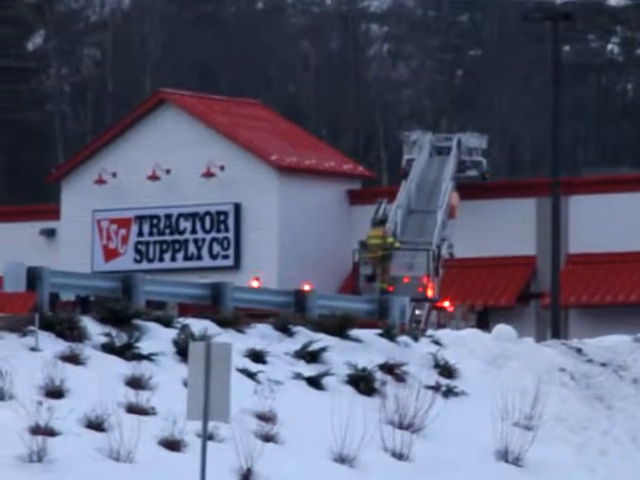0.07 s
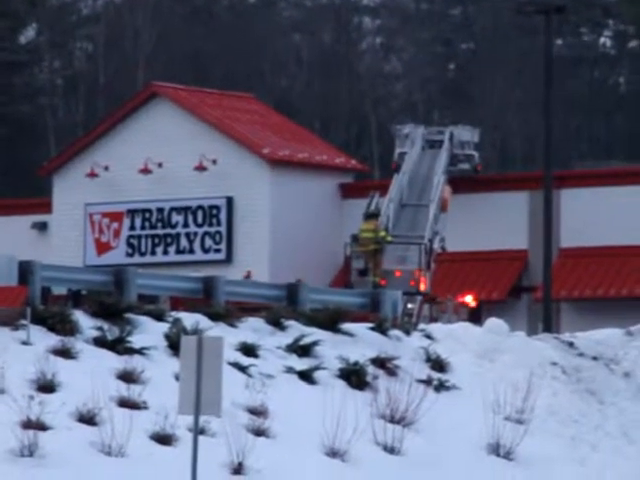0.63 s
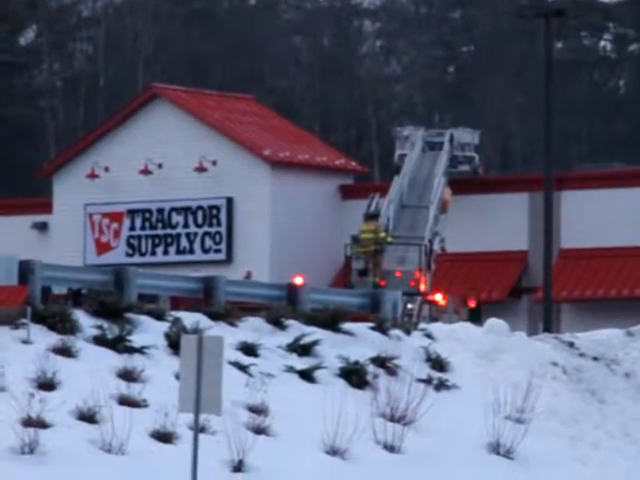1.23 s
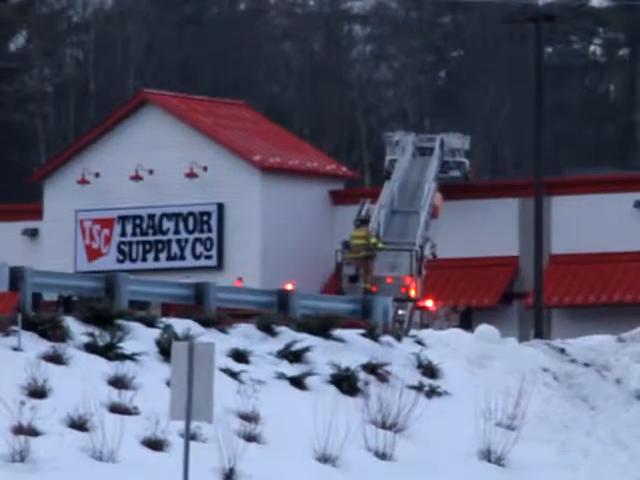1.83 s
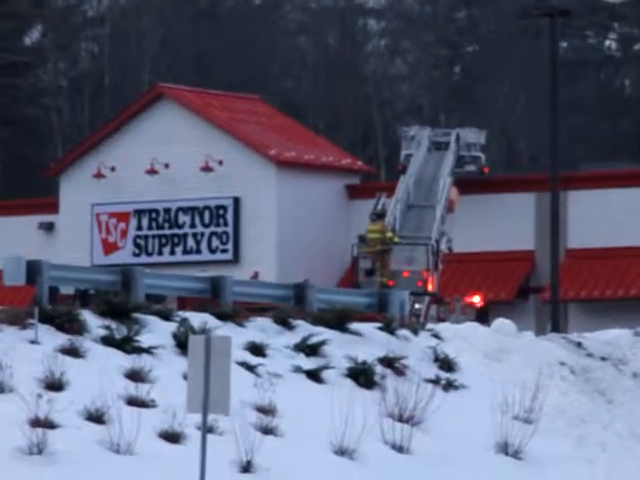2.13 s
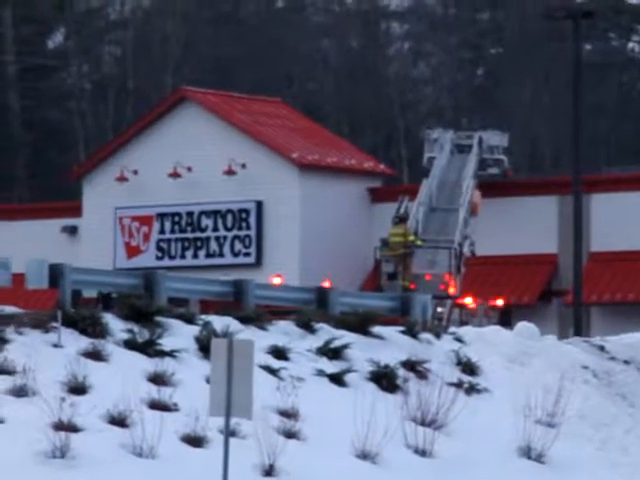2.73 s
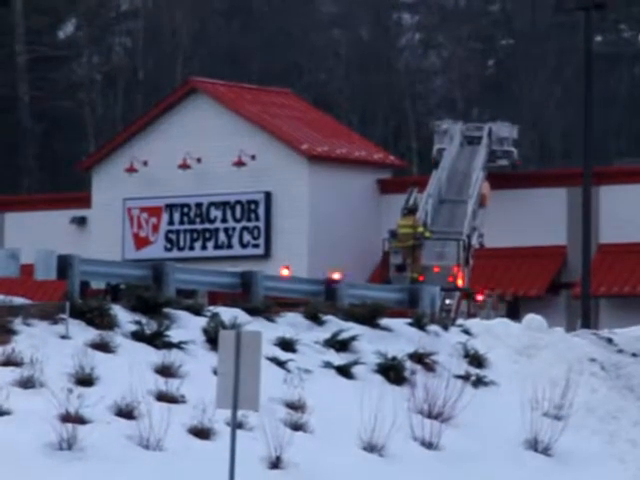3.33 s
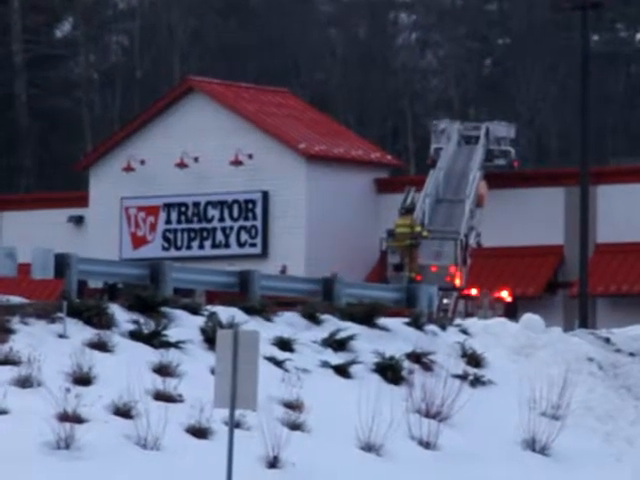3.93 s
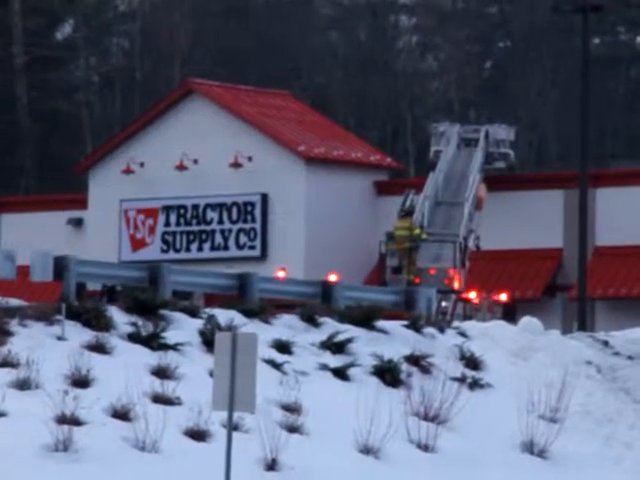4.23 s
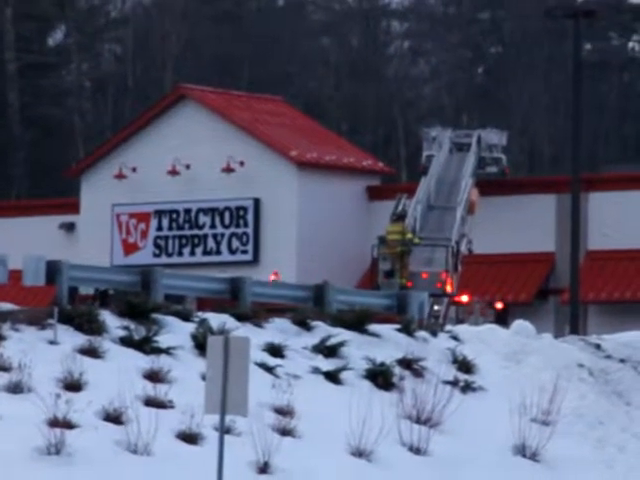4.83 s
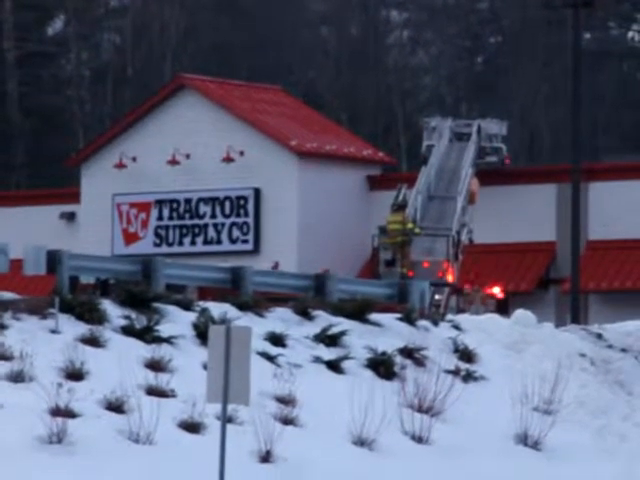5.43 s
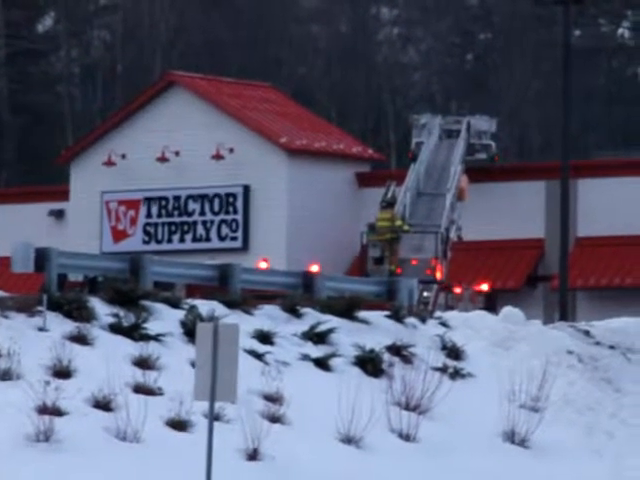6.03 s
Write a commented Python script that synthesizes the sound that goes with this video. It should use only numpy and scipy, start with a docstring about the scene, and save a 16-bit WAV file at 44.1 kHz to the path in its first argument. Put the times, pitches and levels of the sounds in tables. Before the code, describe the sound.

From the verge of a wet highway, tyres make a continuous rushing roar over a low rumble and the hum of a parked diesel truck. One car hisses past at the start, then a closer one goes by about halfway, dropping in pitch with spray and a gentle gust. A fainter hiss follows later as far traffic swells. All along, a heavy engine's drone gradually falls.

```python
"""Cars roar past on a damp winter highway, heard from the verge, with spray hissing off their wheels.
The tyre roar is noise with a resonance that sweeps down as the nearest car goes by, pushing a soft
gust of air. A heavy engine drones and sinks in pitch, its firing harmonics sliding through the
exhaust resonance. Distant traffic thins and builds again, and a parked truck idles underneath."""
import sys
import numpy as np
from scipy import signal
from scipy.fft import rfft, irfft
from scipy.io import wavfile

SR = 44100
rng = np.random.default_rng(int(sys.argv[2]) if len(sys.argv) > 2 else 0)


def transcribe(signal):
    """Save signal, clipped to [-1, 1], as a 16-bit WAV file at the path in sys.argv[1]."""
    frames = np.atleast_2d(signal).T
    limited = np.clip(frames, -1, 1)
    pcm = np.round(limited * 32767).astype(np.int16)
    wavfile.write(sys.argv[1], SR, pcm)


N = 272525
HOP = 256
TIME = np.arange(N) / SR
FRAME_S = np.arange(N // HOP + 2) * HOP / SR
BIN_HZ = np.maximum(np.arange(2 * HOP + 1) * SR / (4 * HOP), 1)[:, None]
DOPPLER = 0.14  # car speed over the speed of sound

# cars throwing up water: abreast t/s, time alongside/s, spray level/dB, fine-hiss beam/dB, hollow f/Hz
CARS = [(.03, 0.42, -36.5, 33, 9470), (2.55, 0.85, -35.5, 36.5, 10030), (4.6, 0.38, -47, 12, 9900)]


def tyres(whine_hz=1770, coming_db=4.5, gone_db=0.6, flutter_db=0.8, trim_db=-1.5):
    """Tread roar: its resonance sinks and widens as a car goes by, and its whine drops with Doppler."""
    # tread noise spectrum: f/Hz, relative level/dB
    tread = [(150, -47), (350, -20.5), (440, -4), (560, -6.5), (800, -3), (1080, -4), (1300, -2.5),
             (1850, -9), (2500, -13.5), (3100, -19), (4500, -29.5), (6300, -39.5), (9000, -61),
             (12000, -90)]
    # roar envelope: t/s, level/dB before trim and sings
    roar = [(0.0, -22), (0.36, -19), (0.55, -20), (0.66, -19.5), (0.8, -18.5), (1.27, -18.5), (1.35, -19),
            (1.52, -17.8), (1.59, -20.5), (1.62, -17), (1.78, -18), (1.83, -18.7), (2.1, -17), (2.27, -16),
            (2.33, -17), (2.63, -16.5), (2.8, -17.1), (3.06, -21), (3.63, -21), (3.95, -24), (4.27, -21.5),
            (6.18, -20.5)]
    # tyre resonance, deepest with a car alongside: t/s, f/Hz, width/octaves, lift/dB
    sweep = [(0.1, 1400, 0.24, 3), (0.5, 1340, 0.16, 5.5), (1.0, 1280, 0.16, 5.5), (1.5, 1130, .17, 2.5),
             (2.0, 920, 0.21, 1.5), (2.28, 910, 0.18, 5), (2.48, 850, 0.23, 6.5), (2.66, 710, .31, 8.5),
             (2.85, 554, 0.36, 9.5), (3.01, 510, 0.25, 9.5), (3.13, 780, 0.38, 5.5), (3.5, 1090, 0.34, 4.5),
             (4.3, 1320, .16, 2.5), (6.1, 1232, .12, 2)]
    # tyres singing out for a moment: peak t/s, spread/s, f/Hz, width/octaves, lift/dB
    sings = [(.4, .08, 1070, 0.19, 3.5), (.55, 0.075, 1520, .14, 5), (1.15, 0.11, 660, 0.18, 5),
             (1.69, 0.094, 1230, .22, 3.5), (1.78, 0.15, 790, .13, 3.5), (2.17, 0.12, 1200, 0.086, 4.5),
             (2.18, 0.16, 2630, 0.22, 1.5), (2.59, 0.07, 1580, 0.069, 4.5), (2.66, .09, 480, .15, 6),
             (3.5, 0.15, 1420, 0.11, 0), (4.8, 0.035, 1320, .15, 3.5), (5.14, 0.088, 885, .22, 2.5),
             (5.27, .025, 1200, .25, 5.5), (5.92, 0.31, 1220, 0.094, 3)]
    centre_hz, width, lift_db = curve(sweep)
    resonance = lift_db * bell(centre_hz, width)
    upper_band = 2 * closeness(FRAME_S) * bell(1.7 * centre_hz, 0.14)  # a faint lift at the closest pass
    along = bearing(max(CARS, key=lambda car: car[2])[0])  # the loudest car carries the whine
    whine_db = coming_db + (gone_db - coming_db) * (1 + along) / 2
    whine = whine_db * bell(whine_hz / (1 + DOPPLER * along), octaves=0.2)
    singing = sum(db * bell(hz, octaves) * np.exp(-0.5 * ((FRAME_S - s) / spread_s) ** 2)
                  for s, spread_s, hz, octaves, db in sings)
    shape = colour(tread, BIN_HZ) + resonance + upper_band + whine + flutter_db * flutter(rate=9)
    return rush(shape, curve(roar)[0] + trim_db, singing)


def spray(rise_db_per_s=3, fall_db_per_s=20, off_beam_db=-24, forward_db=7, hollow_db=-16):
    """Droplets hiss behind the wheels; beside a car, fine hiss opens above a hollow and sinks with it."""
    # droplet spectrum: f/Hz, relative level/dB
    droplets = [(200, -38), (800, -22), (2000, 3), (3200, 7), (4500, 0), (6500, -7.5), (9000, -14.5),
                (11500, -19.5), (13500, -29), (15500, -42.5)]
    hiss = 0
    for abreast_s, alongside_s, level_db, beam_db, rest_hz in CARS:
        since = FRAME_S - abreast_s
        approach_db = rise_db_per_s * np.maximum(-since - alongside_s / 2, 0)
        tail_db = fall_db_per_s * np.maximum(since - alongside_s / 2, 0)
        along = bearing(abreast_s)
        beside = np.exp(-0.5 * (since / alongside_s) ** 4)
        fine_db = off_beam_db + (beam_db - forward_db * along) * beside  # the beam leans forward
        hollow_hz = rest_hz / (1 + DOPPLER * along)
        fine = fine_db * bell(1.44 * hollow_hz, octaves=0.39)
        hollow = hollow_db * bell(hollow_hz, octaves=0.091)
        shape = colour(droplets, BIN_HZ) + fine + hollow
        flicker_db = walk(rate=24)
        hiss += rush(shape, level_db - approach_db - tail_db + flicker_db)
    return hiss


def engine(unsteady=0.0045, waver_db=0.87, gas_db=-37, throb=0.26, uneven=0.076):
    """Uneven firing slows through a fixed exhaust resonance: harmonic four takes over from two."""
    # firing rate: t/s, f/Hz
    firing = [(0.05, 66.3), (0.35, 66.47), (0.9, 65.25), (1.68, 64.64), (1.95, 62.4), (2.28, 63.15),
              (2.74, 60.04), (3.1, 58.3), (3.6, 56.95), (3.84, 54.43), (6.1, 52.19)]
    # exhaust response: f/Hz, rms level/dB of a harmonic there
    exhaust = [(55, -60.5), (67, -47), (107, -42), (120, -39.5), (131, -32), (160, -30.5), (200, -30.5),
               (213, -29.5), (235, -33.5), (265, -44.5), (330, -49.5), (600, -70)]
    # rough exhaust gas spectrum: f/Hz, relative level/dB
    gas = [(60, -38), (150, 1.5), (240, 5), (300, -6.5), (500, -19.5), (4000, -90)]
    hz = curve(firing, TIME)[0] * (1 + unsteady * walk(12, TIME))
    angle = 2 * np.pi * np.cumsum(hz) / SR
    drone = 0
    for k in range(1, 9):
        level_db = colour(exhaust, k * hz) + waver_db * walk(8.6, TIME)
        drone += np.sqrt(2) * undb(level_db) * np.cos(k * angle)
    strength = undb(walk(0.97, angle / (2 * np.pi)))  # each firing has its own force
    cylinders = 1 + uneven * (np.cos(angle / 2) + np.cos(angle / 4))  # strong and weak take turns
    puffs = undb(gas_db) * low_noise(gas) * (1 + throb * np.cos(angle))  # one with every firing
    return strength * cylinders * drone + puffs


def wake(alongside_db=-42.5):
    """A soft low push of air as the nearest car goes by."""
    # displaced air spectrum: f/Hz, relative level/dB
    air = [(25, -24), (50, -12), (75, 7), (110, -3.5), (300, -47)]
    return undb(alongside_db) * low_noise(air) * closeness(TIME)


def far_traffic(lull_db=-30):
    """The wash of the rest of the highway, thinning and building again."""
    # distant road noise spectrum: f/Hz, relative level/dB
    road = [(120, -41.5), (290, -7), (400, -2), (520, -12.5), (750, 1), (1080, 3), (1450, -3.5),
            (1800, -9.5), (2450, -12.5), (3100, -28), (4500, -29.5), (6300, -39), (9000, -56),
            (12000, -80.5)]
    return rush(colour(road, BIN_HZ), lull_db + swell(FRAME_S))


def rumble(lull_db=-30):
    """Low road rumble of many vehicles, swelling with the wash."""
    # rumble spectrum: f/Hz, relative level/dB
    low_end = [(20, -37), (35, -20.5), (52, -31), (70, -10), (100, -1), (135, 0), (190, 4), (260, 3),
               (320, -1.5), (420, -1.5), (700, 1), (4000, -80)]
    return low_noise(low_end) * undb(lull_db + swell(TIME))


def idle(firing_hz=37.5, unsteady=0.01165, waver_db=1.5):
    """A parked diesel hums at a nearly steady firing rate."""
    # idle harmonics: multiple of the firing rate, rms level/dB
    harmonics = [(1, -67), (2, -63), (3, -38)]
    firings = np.cumsum(firing_hz * (1 + unsteady * walk(5.9, TIME))) / SR
    hum = 0
    for k, db in harmonics:
        amplitude = np.sqrt(2) * undb(db + waver_db * walk(5.2, TIME))
        hum += amplitude * np.sin(2 * np.pi * (k * firings + rng.random()))
    return hum


def bearing(abreast_s, turn_s=0.37):
    """Where a car is along the road: -1 coming, 0 abreast, 1 gone."""
    return (FRAME_S - abreast_s) / np.hypot(FRAME_S - abreast_s, turn_s)


def closeness(at, closest_s=2.858, nearing_s=0.22, leaving_s=0.29):
    """How near the nearest car is: 0 far off, 1 alongside."""
    length_s = np.where(at < closest_s, nearing_s, leaving_s)
    return length_s / np.hypot(at - closest_s, length_s)


def swell(at, lull_s=2.5, db_per_s=1.31):
    """Decibels by which distant traffic stands above its lull."""
    return db_per_s * np.abs(at - lull_s)


def flutter(rate):
    """Turbulent air makes each half octave waver on its own."""
    return sum(bell(hz, 1 / 4) * walk(rate) for hz in 250 * 2 ** (np.arange(12) / 2))


def rush(shape_db, level_db, lift_db=0):
    """Noise with a moving spectrum and a given rms level; lifts come on top of that level."""
    gain = undb(shape_db)
    gain = gain / np.sqrt(np.mean(gain ** 2, axis=0)) * undb(level_db + lift_db)
    size = 4 * HOP
    white = rng.standard_normal((len(FRAME_S) - 1) * HOP)
    frames = signal.stft(white, nperseg=size, noverlap=size - HOP)[2]
    return signal.istft(frames * gain, nperseg=size, noverlap=size - HOP)[1][:N]


def low_noise(points):
    """Noise of rms 1 with a fixed spectrum, finely resolved in the bass."""
    hz = np.maximum(np.arange(N // 2 + 1) * SR / N, 1)
    noise = irfft(rfft(rng.standard_normal(N)) * undb(colour(points, hz)), N)
    return noise / np.std(noise)


def walk(rate, at=FRAME_S):
    """A random wobble: ramps between new values, rate of them per unit of `at`."""
    knots = rng.standard_normal(1024)
    return 1.083 * np.interp(at * rate, np.arange(len(knots)), knots)


def bell(centre_hz, octaves):
    """A resonance hump of height 1."""
    return np.exp(-0.5 * (np.log2(BIN_HZ / centre_hz) / octaves) ** 2)


def colour(points, hz):
    """Level in dB of a spectrum at given frequencies."""
    f, db = np.transpose(points)
    return np.interp(np.log(hz), np.log(f), db)


def curve(table, at=FRAME_S):
    """Each column of a table as a straight-line envelope in time."""
    s, *columns = np.transpose(table)
    return [np.interp(at, s, column) for column in columns]


def undb(db):
    """Decibels to gain."""
    return 10 ** (np.asarray(db) / 20)


def scene():
    """All the traffic at one microphone."""
    return (tyres() + spray() + wake() + far_traffic() + rumble() + engine() + idle())[None]


def record(dry, top_hz=15500):
    """A small camera cuts the top treble off steeply."""
    return signal.sosfilt(signal.ellip(8, 0.2, 70, top_hz, fs=SR, output="sos"), dry)


dry = scene()
out = record(dry)
transcribe(out)
```